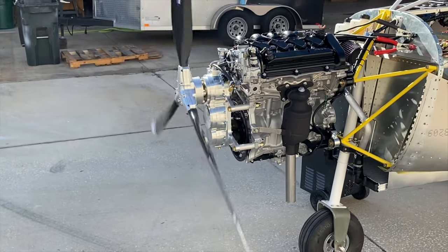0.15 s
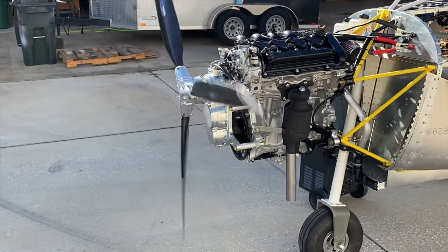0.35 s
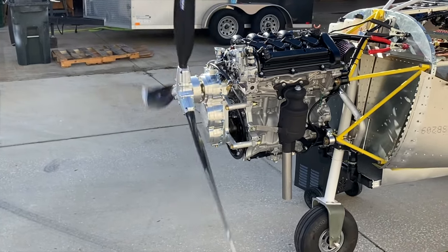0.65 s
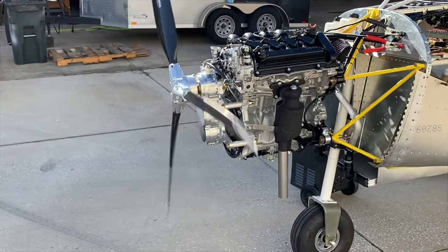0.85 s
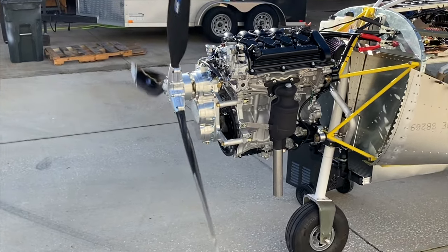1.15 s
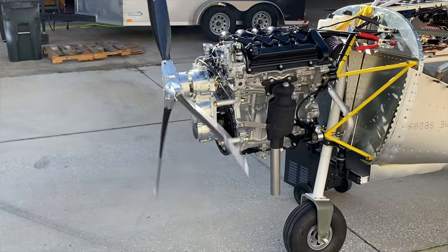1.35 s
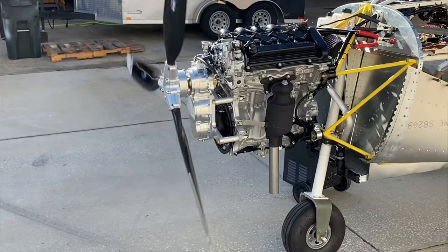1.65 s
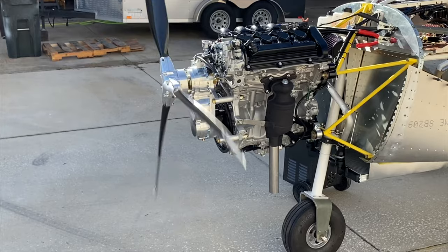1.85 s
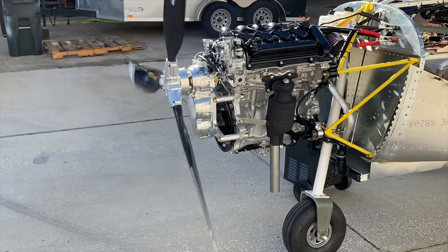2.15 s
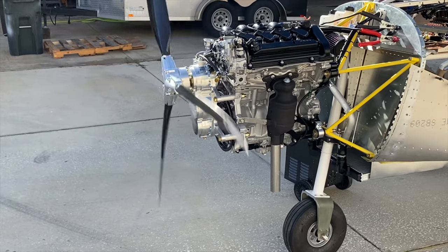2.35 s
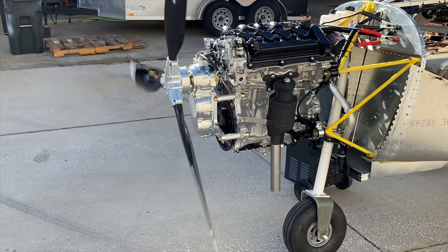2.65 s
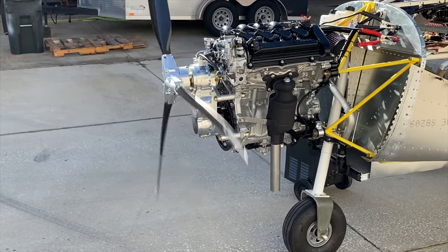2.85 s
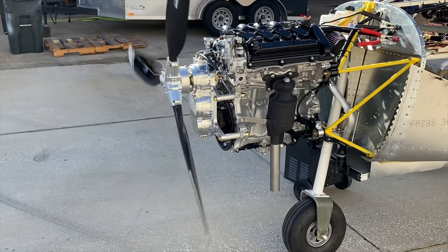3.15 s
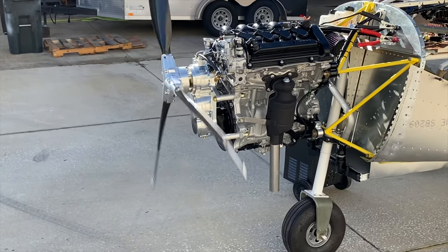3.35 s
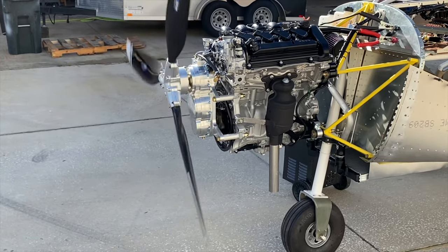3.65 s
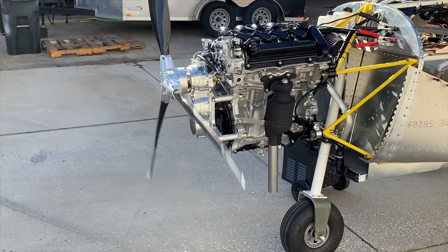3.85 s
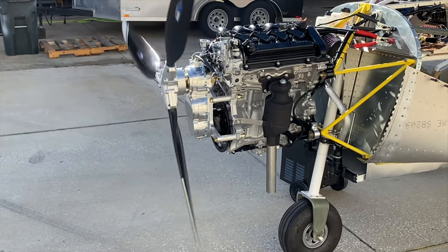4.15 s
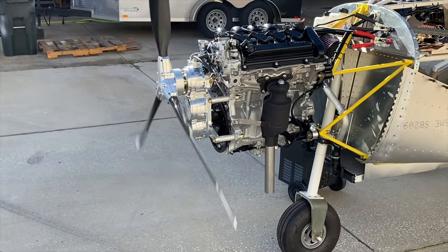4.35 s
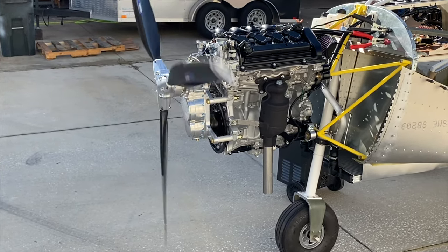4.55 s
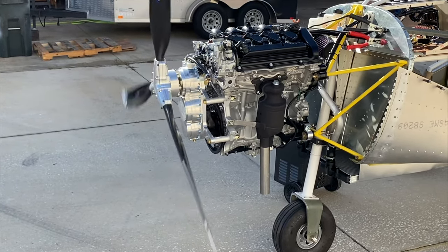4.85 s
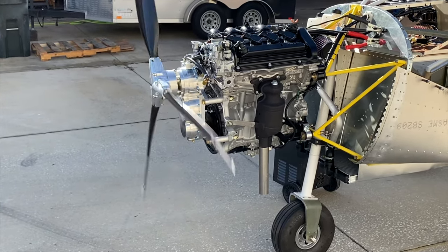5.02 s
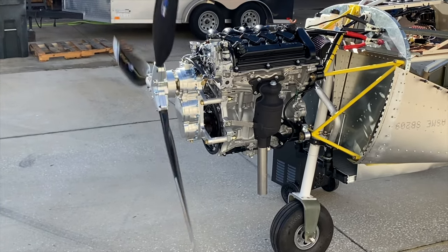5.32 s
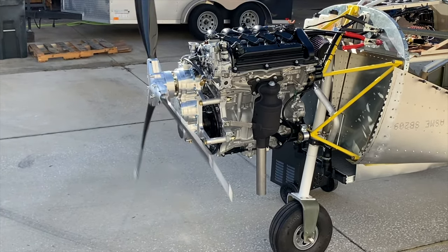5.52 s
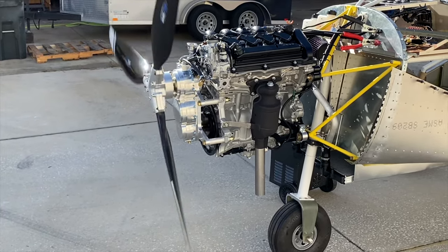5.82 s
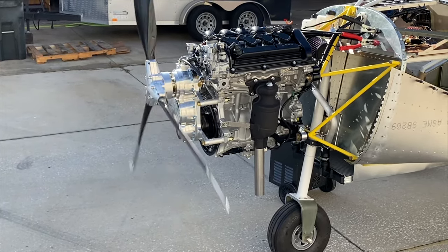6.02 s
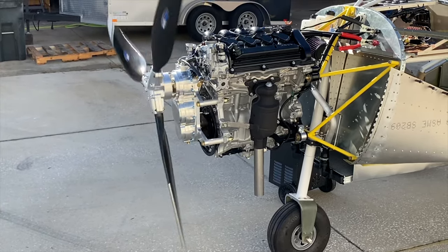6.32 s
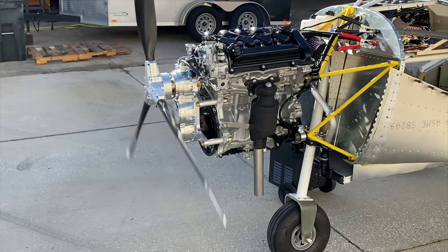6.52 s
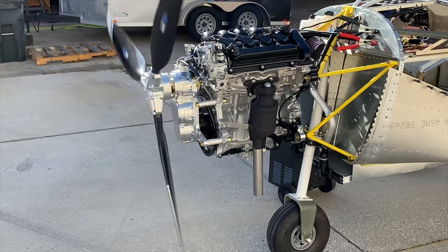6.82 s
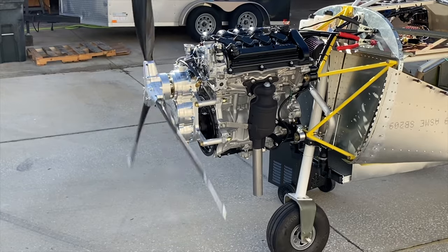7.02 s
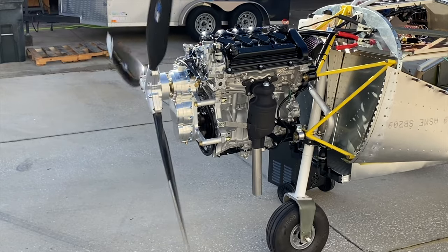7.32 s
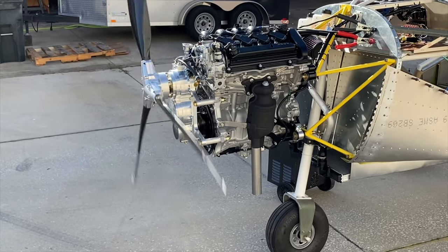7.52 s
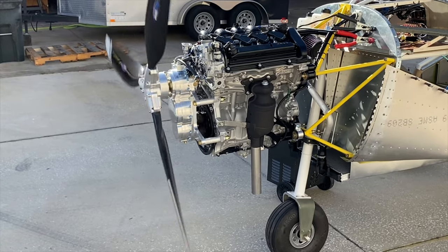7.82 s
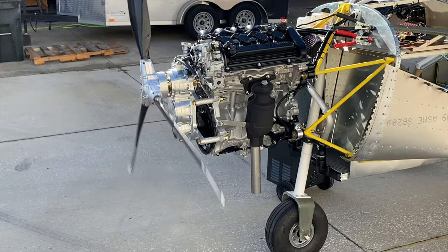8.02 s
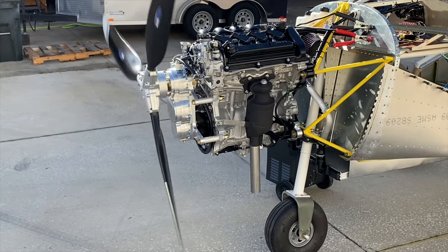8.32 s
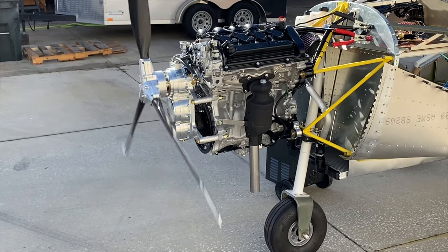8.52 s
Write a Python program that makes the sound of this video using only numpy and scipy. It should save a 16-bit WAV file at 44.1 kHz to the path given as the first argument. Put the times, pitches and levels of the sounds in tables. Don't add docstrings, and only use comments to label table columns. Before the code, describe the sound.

Steady low throbbing of an idling light-aircraft engine, with valve clatter, ticking and airy propeller chop, plus occasional bassy wind buffeting.

```python
import sys
import numpy as np
from scipy import signal
from scipy.fft import rfft, irfft, next_fast_len
from scipy.io import wavfile
from scipy.ndimage import uniform_filter1d, map_coordinates

SR = 44100
rng = np.random.default_rng(int(sys.argv[2]) if len(sys.argv) > 2 else 0)


def to_wav(s):
    ch = np.atleast_2d(s).T
    pcm = np.round(np.clip(ch, -1, 1) * 32767)
    wavfile.write(sys.argv[1], SR, pcm.astype(np.int16))


def to_linear_factor(level_db):
    exponent = np.asarray(level_db, float) / 20
    return 10 ** exponent


N = 382347

# time in seconds, firing rate in Hz.
SPEED_HZ = [(0, 49.1), (.9, 49.05), (1.3, 49.15), (1.9, 49.5), (2.5, 49.21), (3.7, 49.21), (4.5, 48.75),
            (5.3, 49.17), (6.4, 49.13), (7.1, 49.6), (7.7, 49.17), (8.67, 49.1)]
CYLINDER_DB = [-0.14, -1, -.5, -1.5]
# time in seconds, gain in dB.
NEAR_DB = [
    (0, -.5),
    (3.2, -0.4),
    (3.8, -0.03),
    (8.67, -0.22),
]
# frequency in Hz, level in dB per Hz.
BUFFET_DB = [(12, -28), (30, -12), (45, -9), (70, 3.5), (90, 17), (120, 5.5), (200, -5), (350, -26),
             (700, -63)]


def unit(x):
    return x / np.sqrt(np.mean(x ** 2) + 1e-20)


def along(points, hz):
    f, v = np.transpose(points)
    return np.interp(np.log(hz + 1), np.log(f + 1), v)


def curves(rows):
    s, *cols = np.transpose(rows)
    return [np.interp(np.arange(N) / SR, s, c) for c in cols]


def wobble(rate):
    coarse = np.arange(0, N + 64, 64)
    knots = rng.standard_normal(int(N * rate / SR) + 4)
    return np.interp(np.arange(N), coarse, map_coordinates(knots, [coarse * rate / SR]))


def filtered(x, response):
    m = next_fast_len(N + 8192)
    return irfft(rfft(x, m) * response(np.fft.rfftfreq(m, 1 / SR)), m)[..., :N]


def rush(spectrum, patchy_db=None, gate=1):
    x = rng.standard_normal(N)
    if patchy_db:
        z = signal.stft(x, nperseg=512)[2]
        field = uniform_filter1d(rng.standard_normal(z.shape), size=6, axis=0)
        field = uniform_filter1d(field, size=10, axis=1)
        x = signal.istft(z * to_linear_factor(patchy_db * unit(field)), nperseg=512)[1][:N]
    return unit(filtered(gate * x, lambda hz: to_linear_factor(along(spectrum, hz))))


def crank():
    return np.cumsum(curves(SPEED_HZ)[0]) / SR + .4


def blades():
    blade_hz = 32.0
    return np.cos(2 * np.pi * blade_hz * np.arange(N) / SR + 1.0 * wobble(0.95))


def diffuse():
    # frequency in Hz, level in dB per Hz.
    sides_db = [(30, -20), (90, -2), (220, -7.5), (400, -8), (900, -13), (1300, -10.5), (1760, -5.5),
                (2100, -18.5), (2450, -42), (3000, -21), (3350, -33), (3700, -50), (5000, -110)]
    return to_linear_factor(-35.0) * rush(sides_db, patchy_db=3) * [[1], [-1]]


def wash():
    # start in seconds, hold in seconds, level in dB.
    gusts = [
        (1.0, .3, -27.5),
        (4.1, 0.18, -42),
        (5.3, 0.97, -34),
        (8.2, 0.35, -34),
    ]
    breeze_db, rise_s, fall_s = -44, .1, .12
    t = np.arange(N) / SR
    strength = to_linear_factor(breeze_db)
    for start_s, hold_s, db in gusts:
        corners_s = np.cumsum([start_s - rise_s, rise_s, hold_s, fall_s])
        strength = strength + to_linear_factor(db) * np.interp(t, corners_s, [0, 1, 1, 0])
    lumps = to_linear_factor(4 * wobble(22))
    shared = rush(BUFFET_DB, gate=lumps)
    apart = rush(BUFFET_DB, gate=lumps)
    return strength * (shared + to_linear_factor(-16) * apart * [[1], [-1]])


def eddies():
    # pressure dip in seconds, peak in dB, pitch in Hz.
    bursts = [(5.315, -14.5, 77), (5.357, -13, 94), (5.392, -14, 93), (5.48, -11.5, 80), (5.54, -16, 76),
              (5.606, -16.5, 82), (5.811, -10.5, 87), (5.849, -15.5, 101), (5.893, -17, 95),
              (5.948, -17, 93), (5.98, -15.5, 110), (6.017, -11, 85), (6.058, -17, 110), (6.093, -17, 76),
              (6.144, -13, 106), (6.158, -18, 100), (6.218, -14, 74), (6.327, -15, 78), (6.437, -16, 110),
              (6.464, -17, 75), (6.494, -14.5, 80), (6.526, -14.5, 110)]
    eddy_s, early_s = .011, 0.0031
    x, t = np.zeros(N), np.arange(-SR // 20, SR // 20) / SR
    for dip_s, db, hz in bursts:
        bell = np.exp(-((t + early_s) / eddy_s) ** 2)
        x[round((dip_s + t[0]) * SR):][:len(t)] += -to_linear_factor(db) * bell * np.cos(2 * np.pi * hz * t)
    x = filtered(x, lambda hz: hz ** 2 / (hz ** 2 + 30 ** 2))
    swell = uniform_filter1d(np.abs(x), size=600)
    puff = swell * rush([(60, -29), (130, -7), (250, -5.5), (400, -15), (800, -46)])
    apart = swell * rush(BUFFET_DB)
    return x + to_linear_factor(-4.0) * puff + to_linear_factor(-17) * apart * [[1], [-1]]


def whines():
    # centre in Hz, width in Hz, level in dB rms.
    lines = [(759, 7.3, -43.5), (1924, 14, -49.5), (1936, 17, -52.5), (2667, 20, -54.5), (3300, 12, -54.5)]

    def bands(f):
        return sum(to_linear_factor(db) * np.sqrt(SR / np.pi / w) / (1 + 2j * (f - c) / w) for c, w, db in lines)
    return filtered(rng.standard_normal(N), bands)


def valves(firings):
    # centre in Hz, width in Hz, level in dB.
    modes = [(1257, 33, 9), (1555, 78, 8), (2020, 150, -3), (2650, 170, -6.5)]
    count = np.floor(firings).astype(int)
    size_db = 5 * (count % len(CYLINDER_DB) == 0) + 4.2 * rng.standard_normal(count[-1] + 1)[count]
    decay_db = 60 * (firings - count) / 3.6
    knocks = to_linear_factor(size_db - decay_db) * rng.standard_normal(N)

    def ring(f):
        return sum((-1) ** k * to_linear_factor(db) * 1j * f * w / (c * c - f * f + 1j * f * w)
                   for k, (c, w, db) in enumerate(modes))
    return to_linear_factor(-38.5) * unit(filtered(knocks, ring))


def mechanics(firings):
    # frequency in Hz, level in dB per Hz.
    hiss_spectrum = [(900, -34), (1700, -9), (1950, 0), (2450, 0.5), (2650, 1), (2900, -1.5), (4000, -5),
                     (5500, -7), (7000, -8), (7700, -7), (8400, -8.5), (10000, -11.5), (12500, -14),
                     (14000, -12.5), (15600, -7)]
    hiss_db, tick_db, chop_db = -30, -14.5, .75
    flutter_db = 0.15 * wobble(30) + 0.12 * wobble(11.0)
    cycle_db = 0.21 * np.cos(np.pi * firings / 2 + 1.2)
    hiss = rush(hiss_spectrum, patchy_db=0.63, gate=to_linear_factor(chop_db * blades() + flutter_db + cycle_db))
    firings = firings + .27
    count = np.floor(firings).astype(int)
    size_db = np.take(CYLINDER_DB, count % len(CYLINDER_DB))
    size_db = size_db + 2.6 * rng.standard_normal(count[-1] + 1)[count]
    puff = to_linear_factor(size_db - 60 * (firings - count) / 0.76)
    ticks = rush([(1500, -20), (3000, -16), (6000, 7.0), (11000, 0.5), (15000, 0)], gate=puff)
    return to_linear_factor(hiss_db + curves(NEAR_DB)[0]) * (hiss + to_linear_factor(tick_db) * ticks)


def roar(firings):
    # frequency in Hz, level in dB per Hz.
    gas_spectrum = [(22, -20), (33, -18), (45, -11), (60, 0.5), (85, -2.5), (120, -3.5), (200, -5),
                    (370, -5), (500, -9), (760, -9), (1080, -12.5), (1280, -10.5), (1550, -10.5),
                    (1680, -17), (1780, -23.5), (2200, -34), (4000, -40)]
    roar_db = -22.5
    swell_db = 0.19 * np.cos(2 * np.pi * firings) + 0.16 * np.cos(np.pi * firings / 2) + 0.25 * blades()
    flutter_db = 0.16 * wobble(11) + 0.091 * wobble(30)
    gas = rush(gas_spectrum, patchy_db=0.48, gate=to_linear_factor(swell_db + flutter_db))
    return to_linear_factor(roar_db + curves(NEAR_DB)[0]) * gas


def exhaust(firings):
    # multiple of firing rate, level in dB rms, unsteadiness 0-1.
    upper = [(3, -36, 0.74), (4, -34, 0.4), (4.5, -50.5, 0.05), (5, -34, 0.4), (6, -36.5, 0.77),
             (6.5, -53, 0.66), (7, -46, 0.28), (7.5, -50, 0.98), (8, -43, 0.77), (11, -51.5, 0.4)]
    # time in seconds, swell in dB.
    boom = [
        (0, 1.5),
        (.8, -1),
        (3.8, -1),
        (4.7, 3),
        (5.4, 0.5),
        (5.8, -1.5),
        (6.6, -1.5),
        (7.7, 2.5),
        (8.3, 0),
        (8.67, 0),
    ]
    first_db, second_db, upper_db = -22.5, -21.5, 1
    idle_hz, lead_rad_per_hz = 49.15, 1.5
    angle = 2 * np.pi * firings

    def lag_rad(order):
        return min(.6 * (order - 1) ** 1.3, 3.3)

    ahead = lead_rad_per_hz * (curves(SPEED_HZ)[0] - idle_hz)
    tone = to_linear_factor(first_db + 0.62 * wobble(4.3)) * np.cos(angle)
    second_phase = 2 * angle - lag_rad(2) + ahead + 0.049 * wobble(5.3)
    tone = tone + to_linear_factor(second_db + curves(boom)[0] + 0.29 * wobble(10)) * np.cos(second_phase)
    for order, db, unsteady in upper:
        level = to_linear_factor(db + upper_db + 4.0 * unsteady * wobble(12))
        tone = tone + level * np.cos(order * angle - lag_rad(order) + 1.45 * unsteady * wobble(6))
    return -np.sqrt(2) * tone


def scene():
    firings = crank()
    engine = whines() + valves(firings) + mechanics(firings) + roar(firings) + exhaust(firings)
    return engine * to_linear_factor([[-.15], [.15]]) + diffuse() + wash() + eddies()


def roll_off(x):
    return signal.sosfilt(signal.butter(12, 16640, fs=SR, output="sos"), x)


def record(dry):
    # frequency in Hz, phase in half
    treble_turn = [(7150, 0), (7600, .36), (8300, .74), (8750, 1.28), (10100, 2), (11750, 2.9), (12300, 3.1),
                   (15950, 5)]
    sway_share, sway_knots_per_s, top_hz = .009, 22, 15780
    front, sides = (dry[0] + dry[1]) / 2, (dry[0] - dry[1]) / 2
    hz, s, z = signal.stft(front, SR, nperseg=512)
    sway = 1 + sway_share * np.interp(s, np.arange(N) / SR, wobble(sway_knots_per_s))
    turn_rad = np.pi / 2 * np.outer(np.interp(hz, *np.transpose(treble_turn)), sway)
    both, apart = signal.istft(z * [np.cos(turn_rad), -1j * np.sin(turn_rad)], nperseg=512)[1][:, :N]
    scatter_rad = 1.1 * rng.standard_normal(SR // 10)

    def port_response(hz):
        blur = np.exp(1j * np.interp(hz / 8, np.arange(len(scatter_rad)), scatter_rad))
        return (hz < top_hz) * np.array([hz ** 0, blur, hz ** 0])

    both, apart, sides = filtered(np.array([both, apart, sides]), port_response)
    return roll_off(both + (apart + sides) * [[1], [-1]])


dry = scene()
out = record(dry)
to_wav(out)
```